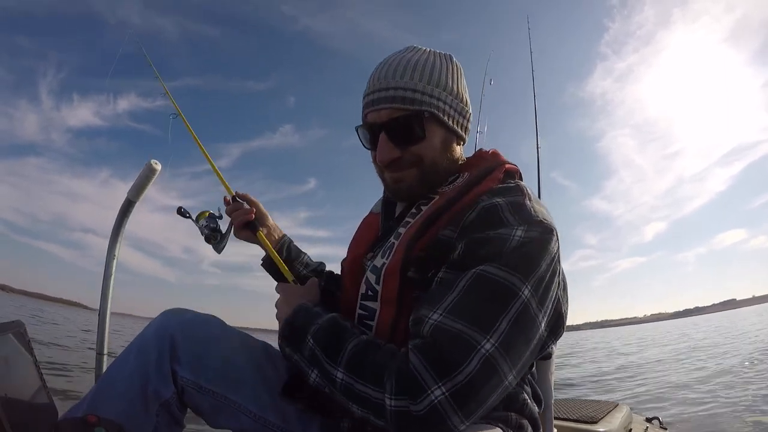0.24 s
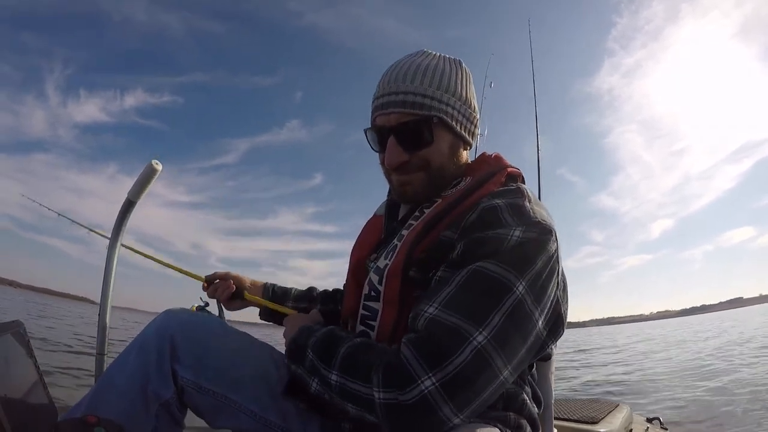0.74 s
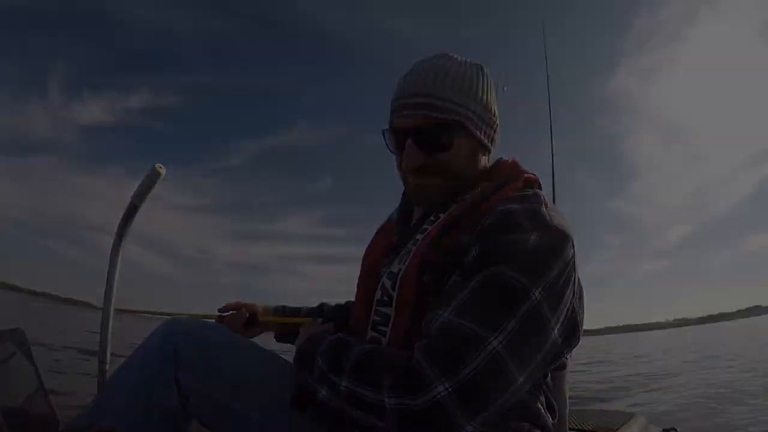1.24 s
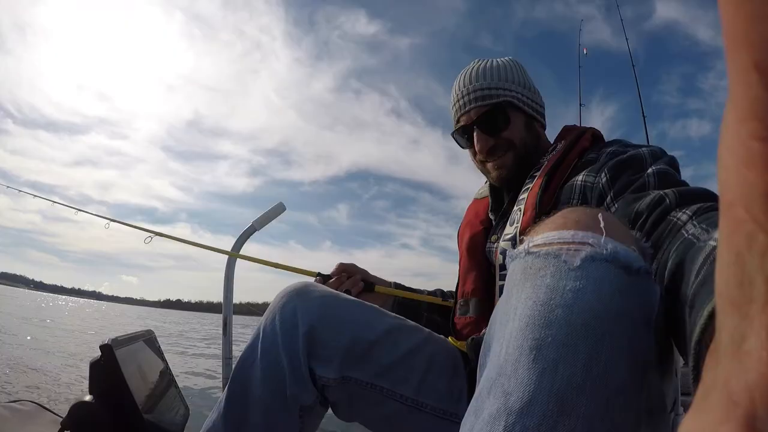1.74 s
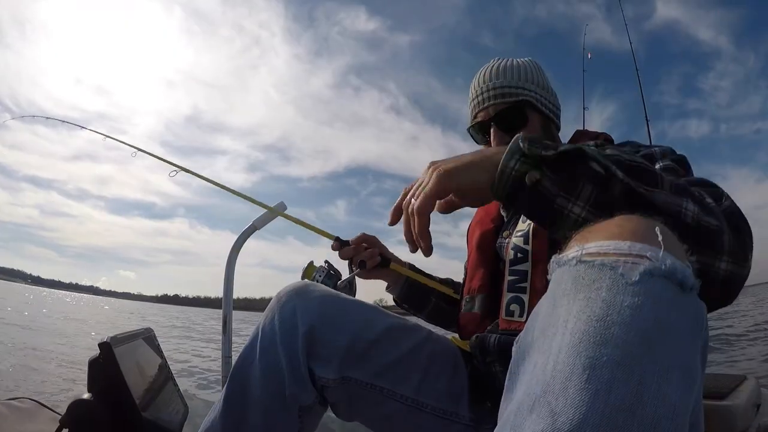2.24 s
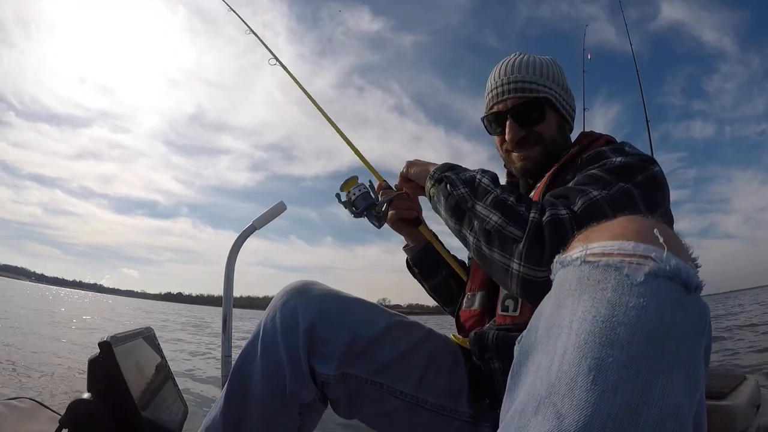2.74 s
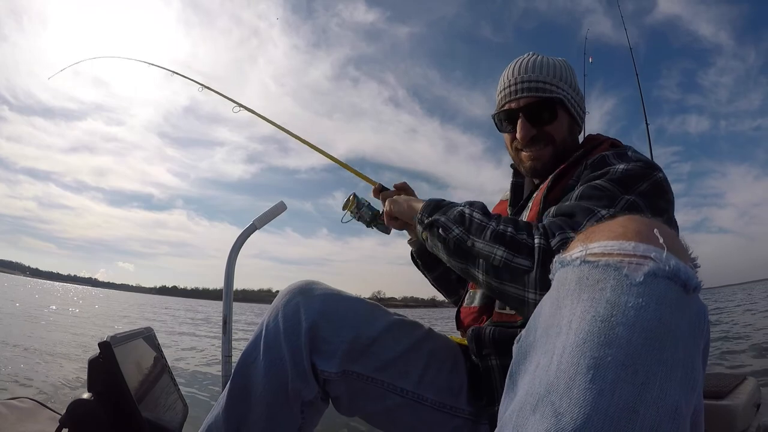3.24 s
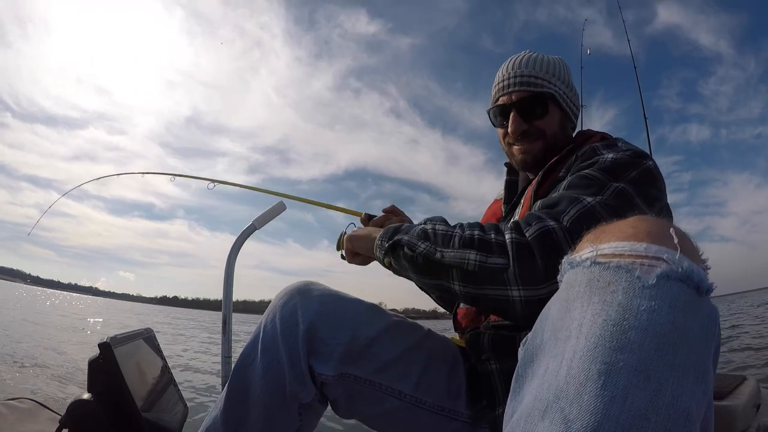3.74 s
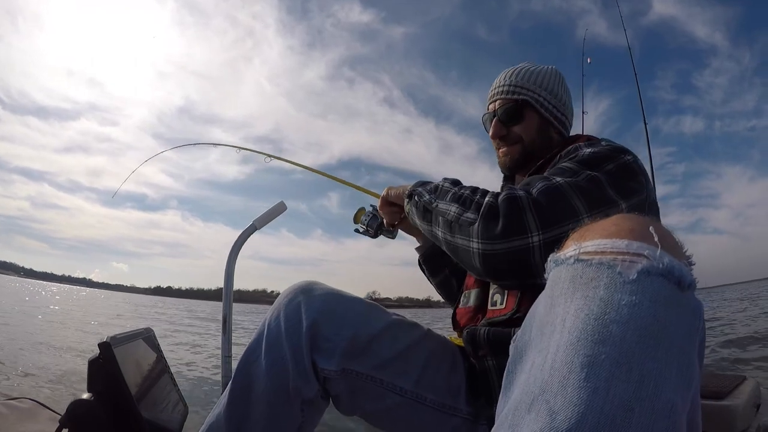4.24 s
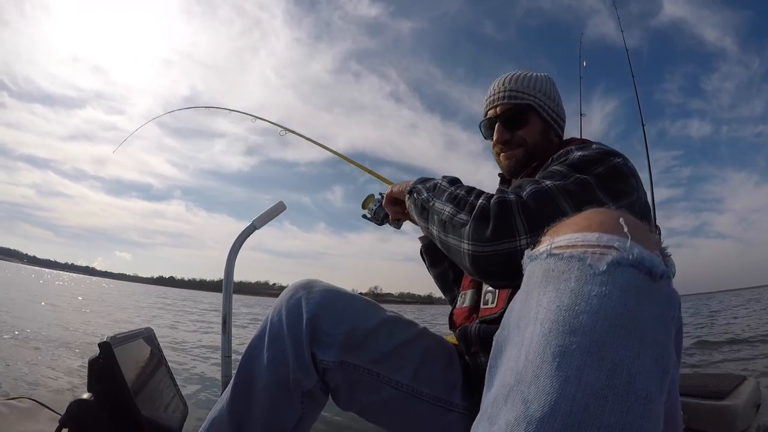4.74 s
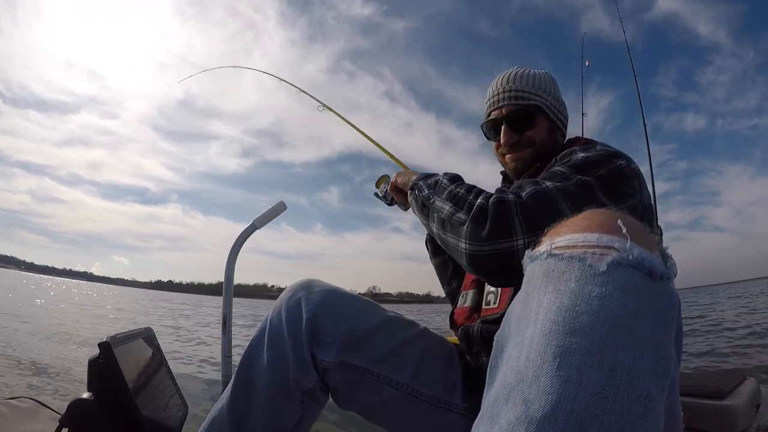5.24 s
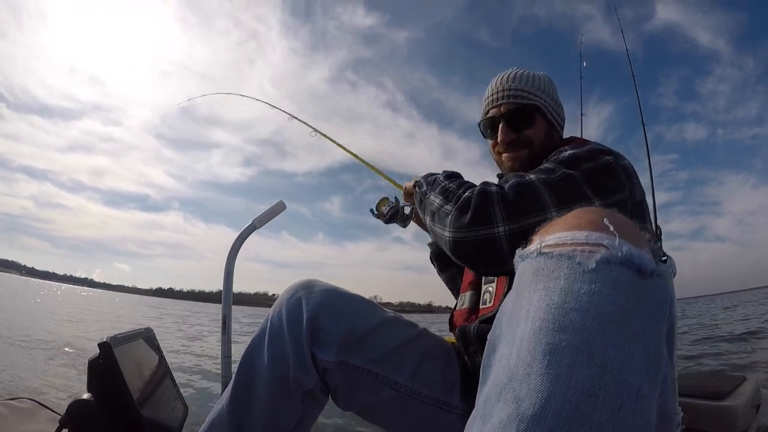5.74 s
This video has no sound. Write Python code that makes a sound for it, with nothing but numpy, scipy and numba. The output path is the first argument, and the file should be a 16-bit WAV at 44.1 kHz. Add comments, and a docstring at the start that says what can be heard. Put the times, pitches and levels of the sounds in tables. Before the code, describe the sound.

Four dull, quiet knocks with loose rattling fade away, leaving a very short gap. A hard cut brings a heavy jolt and strong, regular clanking blows on the hollow hull, each followed by a rebound and smaller metallic ticks. A steady whirring motor, gritty hiss and low wind rumble fill the spaces. Very close, hull-mounted microphone outdoors on water, with slightly distorted peaks.

```python
"""On a boat, microphone fixed to the hull: a motor-driven metal hammer beats a plastic kayak.
The arm bounces, is picked up again by a cam and rattles between blows. Heard softly and fading out from a
first mount, then at once from a livelier second mount, with gear whine, wallowing hull and wind rumble.
Metal is noise bursts and ringing modes, the hull a bank of panel modes, the motor overtones and gritty hiss;
wind is low noise, and blows overload the microphone."""
import sys
import numpy as np
from scipy import signal
from scipy.fft import rfft, irfft
from scipy.io import wavfile
from scipy.ndimage import uniform_filter1d
from numba import njit

SR = 44100
rng = np.random.default_rng(int(sys.argv[2]) if len(sys.argv) > 2 else 0)


def file_out(sig):
    """Save sig as 16-bit WAV at sys.argv[1]."""
    # one column per channel
    cols = np.atleast_2d(sig).T
    # limit, then scale
    lim = np.clip(cols, -1, 1)
    pcm = np.round(lim * 32767).astype(np.int16)
    wavfile.write(sys.argv[1], SR, pcm)


N = 263718

# All contact levels are relative; scene() sets the balance of the layers.
# hammer blows: start_s [s], clack_db [dB], boom_db [dB], knock_db [dB]
BLOWS = [(0.086, -17, -16, -15.5), (0.5109, -18, -12, -17), (0.928, -17.5, -27, -17),
         (1.3573, -23, -26, -26), (1.7697, -46.5, -58, -48), (1.9324, 5.5, 1, -2.5), (2.3486, 1, -1.5, -4),
         (2.7568, 2, -3.5, -5.5), (3.1783, 2, -6, -5), (3.5968, 4, -3.5, -5), (4.0105, 1, -6.5, -4),
         (4.4307, 1, -3.5, -5.5), (4.8401, 2, -3.5, -6), (5.2648, 1.5, -3, -5.5), (5.673, 2, -1.5, -6)]
# hull panels: pitch_hz [Hz], t60_s [s], then level_db [dB] of first-mount blows, first-mount rattles,
# second-mount blows, second-mount rattles
HULL_PANELS = [(121.4, 0.04, -21.5, -2, -10, -38), (158.5, 0.065, -17, -17, 5, -0.5),
               (228, 0.09, 11, 5.5, 1.5, 2.5), (254.1, 0.13, -5.5, -1.5, -6.5, -7),
               (295.4, .12, -18, -15.5, -18, -6.5), (338.5, 0.096, -10, -13.5, -9.5, -19),
               (393.8, 0.11, -14, -8, -13, -13), (441, .08, -22, -11.5, -4.5, -3.5),
               (479.7, 0.08, -9, -12.5, -9.5, -4), (532, 0.14, -23, -15, -21, -14.5),
               (648.3, 0.041, -14, -9.5, -8.5, -7), (819.4, 0.053, -23, -18.5, -5.5, -13),
               (865.5, 0.086, -12.5, -26.5, -18, -18.5), (1237, 0.038, -20, -31.5, -8, -54),
               (1250, 0.0083, -40, -44, -16.5, -54)]
# modes of the metal arm: pitch_hz [Hz], level_db [dB], t60_s [s]
ARM_MODES = [(1160, -8, 0.03), (1747, 0, 0.0071), (2196, -5.5, 0.01), (2620, -11, .02), (3318, 4, 0.011),
             (3730, -5.5, .02), (4547, -7.5, 0.024), (4670, -7.5, .015), (5320, -12.5, 0.015),
             (5434, -7, 0.023), (7170, -17, 0.025), (7500, -34, .014), (8460, -17.5, .01),
             (10800, -32, 0.013)]
# contact noise of the metal: freq_hz [Hz], level_db [dB per Hz]
CRACK_SPECTRUM = [(530, 5.5), (900, -11), (2080, -5.5), (3820, 1), (4360, -4.5), (6670, -21.5),
                  (8400, -21.5), (11400, -22), (14300, -40), (15400, -62), (16400, -75)]
# motor pitch over one turn of the cam: after_blow_s [s], first_hz [Hz], later_hz (a little faster) [Hz]
CAM_PITCH = [(0, 757, 762), (.05, 750, 763), (.08, 722, 730), (.17, 731, 749), (.21, 733, 741),
             (.3, 742, 752), (.42, 757, 763)]
# motor overtones: multiple [of the fundamental], first_mount_db [dB], second_mount_db [dB]
WHINE_OVERTONES = [(1, -2, 0), (2, -16, -17), (3, -24, -12), (4, -13, -25), (5, -16, -26), (6, -16, -21),
                   (7, -23, -22), (8, -19, -40), (9, -9, -21), (10, -24, -27), (11, -37, -28),
                   (12, -17, -26), (13, -14, -32), (14, -23, -29), (15, -32, -28), (16, -36, -29),
                   (17, -45, -33), (18, -47, -35), (19, -45, -40)]
# gear and water hiss: freq_hz [Hz], level_db [dB against white noise of rms 1]
GEAR_SPECTRUM = [(60, -39), (150, -12), (300, -36.5), (450, -34), (900, -41), (1600, -46), (3400, -47),
                 (4200, -51), (5000, -54), (6200, -56), (8500, -57), (11500, -58), (13000, -60),
                 (14600, -66), (16000, -77.5)]
# hiss level over time: start_s [s], level_db [dB]
HISS_LEVEL = [(0, -22), (1.0, -25), (1.5, -39), (1.8, -34), (1.861, -64), (1.863, 3.5), (6, -1.5)]
# overload level through the fade: start_s [s], level_db [dB]
OVERLOAD_LEVEL = [(0, -8.6), (1.0, -8.6), (1.4, -14), (1.8, -36), (1.861, -36), (1.862, -.6), (6, -.6)]
# response of the first mount to metal sounds: freq_hz [Hz], gain_db [dB]
FIRST_MOUNT_RESPONSE = [(150, -9), (700, -2), (1200, 4.5), (1800, -20), (2600, -8), (3400, -10.5),
                        (4600, 1.5), (7000, 0), (9500, 7), (12000, 6), (15000, 2.5)]
# noise of loose parts, also used for scraping: freq_hz [Hz], level_db [dB per Hz]
BUZZ_SPECTRUM = [(500, -12.5), (900, 4), (1600, 12), (3300, 10.5), (5000, 2), (7000, -15), (12000, -21),
                 (15000, -36)]
# whine level over one turn of the cam: after_blow_s [s], level_db [dB]
WHINE_LOAD = [(0, 5), (.03, -5), (.09, -1), (.14, -4.5), (.22, -2), (.32, -0.5), (.42, -4.5)]
# cam sliding under the arm: start_s [s], level_db [dB]
SCRAPE_LEVEL = [(1.86, -89), (2.02, -57), (2.86, -56), (3.0, -44), (3.29, -54), (3.5, -46), (4.55, -68),
                (5.38, -62), (5.47, -48), (5.98, -53)]
# whine level over time: start_s [s], level_db [dB]
WHINE_FADE = [(0, -7), (1.0, -4), (1.5, -14), (1.8, -30), (1.861, -60), (1.863, 1.5), (6, 2.5)]
# rebounds of the arm, second mount: start_s [s], clack_db [dB], knock_db [dB]
REBOUNDS = [(2.0091, -3.5, -17), (2.4173, -3, -17), (2.836, -3, -15.5), (3.249, -7, -16),
            (3.6713, -1.5, -21), (4.0805, -7, -22), (4.504, -4, -13.5), (4.9137, -5, -16),
            (5.3377, -3.5, -22), (5.7417, -4, -19)]
# pick-ups of the arm by the cam, second mount: start_s [s], clack_db [dB], knock_db [dB]
PICKUPS = [(2.1245, -15.5, -7.5), (2.5272, -12, -5.5), (2.9614, -15, -9.5), (3.37, -11, -6.5),
           (3.7911, -9.5, -10), (4.1988, -17, -11.5), (4.6164, -17, -13), (5.0323, -13.5, -13.5),
           (5.4493, -7, -10.5), (5.8577, -16, -13.5)]
# catches of the slack, second mount: start_s [s], clack_db [dB], knock_db [dB], treble_db [dB against clack]
CATCHES = [(2.2039, -5.5, -19, -7), (2.5961, -6, -14.5, -19), (3.0515, -6.5, -21.5, -30),
           (3.4431, -7, -15.5, -12.5), (3.8641, -11.5, -15.5, -10), (4.2699, -7, -13.5, -8),
           (4.6899, -7, -19, -5), (5.1056, -11.5, -11.5, -7.5), (5.5202, -10.5, -19, -6),
           (5.9329, -12.5, -12.5, -1.5)]
# loose knocks at the first mount, and a thump as the second mount begins: # start_s [s], clack_db [dB],
# knock_db [dB], treble_db [dB against clack]
KNOCKS = [(0.1408, -28, -27.5, -20), (0.1505, -47, -46, 5), (0.1892, -36, -20, -19),
          (0.2265, -40, -31.5, -9), (0.2481, -39, -35, -9), (0.5532, -38, -25, -13),
          (0.5806, -33, -18.5, 0), (0.6184, -55, -30.5, -6), (0.6479, -44, -48, -12),
          (0.6885, -31, -19, -8), (0.7257, -40, -31.5, -2), (0.9785, -37, -27, -13),
          (0.9917, -39, -41.5, -3), (1.0306, -40, -21.5, -22), (1.072, -40, -35, -4),
          (1.3997, -45, -28, -21), (1.4151, -42, -31, -4), (1.4525, -70, -37.5, -11),
          (1.5219, -40.5, -34, -13), (1.861, -52, -16, -8)]
# wind rumble: freq_hz [Hz], level_db [dB per Hz]
WIND_SPECTRUM = [(2, -20), (7, 0), (16, 0), (30, -9), (45, -24), (120, -60), (1000, -110)]
# many small hull modes together: freq_hz [Hz], level_db [dB per Hz]
WASH_SPECTRUM = [(90, -30), (150, -3), (230, 0), (450, -5), (900, -20), (1600, -40), (4000, -80)]

# Pairs below are (first mount, second mount) unless noted.
CUT_S, SILENT_S = 1.86, 1.803  # change of mount; end of the fade, silent until the change
BOOM_TOP_HZ, BRIGHT_HZ, TOP_HZ = 190, 6000, 15900
WHINE_DB = (-64, -41)  # reference rms of the overtones, before load and fade
THIN_TONE_HZ, THIN_TONE_DB = 14400, (-96, -79)  # thin tone, before load and fade
RATTLE_BODY_DB = 0.5
TRAVEL_CYCLES = (1.2, .1)  # delay of each panel in its own cycles

# colour of a contact: (treble dB against clack, buzz dB against clack), before the balance in scene()
REBOUND, PICKUP, TICK = (-7, -25), (-5, -8), (-25, -11)
CATCH_BUZZ_DB, KNOCK_BUZZ_DB = -22, -9  # against the clack
# touch beside a contact: (offset s, clack dB and knock dB against it, treble dB and buzz dB of its own)
BLOW_TOUCH_FIRST, BLOW_TOUCH = (.0213, -33, -6, -16, -17), (.02, -9, -9, -10, -24)
REBOUND_TOUCH, REBOUND_SETTLE = (.023, -15, 1, -28, -12), (.04, -32, -3, -10, -12)
PICKUP_TOUCH, CATCH_TOUCH = (.02, -2, -3, -14, -9), (-.0102, -14, -12, -10, -17)
RELEASE_TICK_FIRST = (-.091, -33, -45, -24, -13)
TICKS_AFTER_CATCH_S = (.028, .11)  # earliest, latest of three stray ticks a turn
TICK_DB, TICK_KNOCK_DB, TICK_SCATTER_DB = -33, -34, 4

WALLOW_HZ, WALLOW_RISE_S, WALLOW_T60_S = 64.5, .033, .36
WALLOW_BLOW_DB, WALLOW_KNOCK_DB = (-13, -15), (-11, -17)  # against the knock
WALLOW_REST_DB, JOLT_WALLOW_DB = (-66, -37), -13
WIND_DB, WIND_GUST_DB, SHUDDER_DB = (-55, -26.5), 2.5, -14  # shudder is against the wallow
JOLT_S, JOLT_WIDTH_S, JOLT_DB = 1.877, .005, -7  # the second mount is shoved once
WASH_RISE_S, WASH_T60_S = .015, .29
WASH_BLOW_DB, WASH_KNOCK_DB = -25, -23  # against the knock


def undb(db):
    """dB to gain."""
    return 10 ** (np.asarray(db) / 20)


def curve(s, values):
    """Points joined by straight lines, one value a sample."""
    return np.interp(np.arange(N) / SR, s, values)


def shape(x, points):
    """Filter a sound by (Hz, dB) points, straight over log frequency."""
    hz, db = np.transpose(points)
    f = np.maximum(np.fft.rfftfreq(N, 1 / SR), 1)
    gain = undb(np.interp(np.log(f), np.log(hz), db))
    return irfft(rfft(x) * gain, N)


def coloured(points):
    """Noise of rms 1 with the given spectrum."""
    x = shape(rng.standard_normal(N), points)
    return x / x.std()


def grains(grain_db, size):
    """Uneven grains of the given length in samples, rms 1."""
    steps = np.repeat(rng.standard_normal(N // size + 1), size)[:N]
    g = uniform_filter1d(undb(grain_db * steps), size=size // 2)
    return g / np.sqrt(np.mean(g ** 2))


def walk(size):
    """Slow random wander, spread 1."""
    x = uniform_filter1d(uniform_filter1d(rng.standard_normal(N), size), size)
    return x / x.std()


def train(s, size):
    """An impulse of the given size at each time."""
    x = np.zeros(N)
    np.add.at(x, np.clip((s * SR).astype(int), 0, N - 1), size)
    return x


def ring(x, hz, t60):
    """One mode: a unit impulse gives a sine decaying from height 1."""
    r = np.exp(-np.log(1000) / (t60 * SR))
    w = 2 * np.pi * hz / SR
    return signal.lfilter([0, r * np.sin(w)], [1, -2 * r * np.cos(w), r * r], x)


def burst(x, rise_s, t60):
    """Envelope that rises and decays after each impulse."""
    t = np.arange(int(.15 * SR)) / SR
    pulse = (1 - np.exp(-t / rise_s)) * 1000 ** (-t / t60)
    return np.abs(signal.fftconvolve(x, pulse / pulse.max())[:N])


def motor_hiss():
    """Gears and water make a gritty hiss: coloured noise in uneven grains."""
    return undb(curve(*np.transpose(HISS_LEVEL))) * grains(2.1, size=300) * shape(rng.standard_normal(N), GEAR_SPECTRUM)


def whine():
    """The motor sags as the cam takes the load and climbs back until the arm drops; a thin tone rides along."""
    t, blows = np.arange(N) / SR, np.array(BLOWS)[:, 0]
    turn_s = CAM_PITCH[-1][0]
    first, again = t < CUT_S, blows[blows > CUT_S][0]
    # time since the last blow; before the first blow at each mount, count back from the end of a turn
    since = t - np.r_[blows[0] - turn_s, blows][np.searchsorted(blows, t)]
    since = np.where(~first & (t < again), t - again + turn_s, since)
    after, first_hz, later_hz = np.transpose(CAM_PITCH)
    hz = np.where(first, np.interp(since, after, first_hz), np.interp(since, after, later_hz))
    hz = hz + 15. * uniform_filter1d(rng.standard_normal(N), size=600)
    phase, out = 2 * np.pi * np.cumsum(hz) / SR, 0
    for k, first_db, later_db in WHINE_OVERTONES:
        # each overtone flickers on its own
        flicker_db = 100. * uniform_filter1d(uniform_filter1d(rng.standard_normal(N), size=1500), size=500)
        db = np.where(first, first_db + WHINE_DB[0], later_db + WHINE_DB[1]) + flicker_db
        out = out + np.sqrt(2) * undb(db) * np.sin(k * phase + 2 * np.pi * rng.random())
    thin_tone = np.sin(2 * np.pi * THIN_TONE_HZ * t)
    out = out + np.sqrt(2) * undb(np.where(first, *THIN_TONE_DB)) * thin_tone
    load_db = np.interp(since, *np.transpose(WHINE_LOAD))
    return out * undb(load_db + curve(*np.transpose(WHINE_FADE)))


def wallow_and_wind(blow_s, blow_db, knock_s, knock_db):
    """Every contact sets the whole hull wallowing near one pitch; wind rumbles below it."""
    first = np.arange(N) / SR < CUT_S
    # doubled dB: kicks add as powers
    kicks = (train(blow_s, undb(2 * (blow_db + np.where(blow_s < CUT_S, *WALLOW_BLOW_DB))))
             + train(knock_s, undb(2 * (knock_db + np.where(knock_s < CUT_S, *WALLOW_KNOCK_DB))))
             + train(np.array([CUT_S]), undb(2 * JOLT_WALLOW_DB)))
    t = np.arange(SR) / SR
    swell = ((1 - np.exp(-(t / WALLOW_RISE_S) ** 2)) * 1000 ** (-t / WALLOW_T60_S)) ** 2
    swing = np.sqrt(np.abs(signal.fftconvolve(kicks, swell / swell.max())[:N]))
    hz = WALLOW_HZ + 110. * uniform_filter1d(rng.standard_normal(N), size=3000)
    wallow = np.sqrt(2) * np.sin(2 * np.pi * np.cumsum(hz) / SR)
    wind = signal.hilbert(coloured(WIND_SPECTRUM))
    wind = np.real(wind) / (.4 + np.abs(wind)) * 1.9  # evened out to rms near 1
    rest = undb(np.where(first, *WALLOW_REST_DB) + 3.5 * walk(size=2500))
    gusts = undb(np.where(first, *WIND_DB) + WIND_GUST_DB * walk(size=2500))
    jolt = -undb(JOLT_DB) * np.exp(-((np.arange(N) / SR - JOLT_S) / JOLT_WIDTH_S) ** 2 / 2)
    return jolt + np.hypot(swing, rest) * wallow + np.hypot(undb(SHUDDER_DB) * swing, gusts) * wind


def clacks(s, db, treble_db, rise_s, t60, ring_db):
    """Metal chatters on contact for some ms and rings the arm; sharp contacts carry more treble."""
    noise, out = rng.standard_normal(N), 0
    crack = coloured(CRACK_SPECTRUM)
    for band_db, kind in ((db, "low"), (db + treble_db, "high")):
        envelope = burst(train(s, undb(band_db)), rise_s, t60)
        arm = 0
        for hz, mode_db, mode_t60 in ARM_MODES:
            if (hz > BRIGHT_HZ) == (kind == "high"):
                arm = arm + undb(mode_db) * ring(envelope * noise, hz, mode_t60) / np.sqrt(mode_t60 * SR)
        band = signal.butter(4, BRIGHT_HZ, kind, fs=SR, output="sos")
        out = out + envelope * signal.sosfilt(band, crack) + undb(ring_db) * arm
    return out


def buzz(s, db, t60):
    """Loose parts jitter while the hull shakes: grainy noise decaying after each contact."""
    return burst(train(s, undb(db)), .004, t60) * grains(4., size=100) * coloured(BUZZ_SPECTRUM)


def hull(s, boom_db, knock_db, scatter_db, spread_s, order):
    """Bending waves reach the mount later the lower they are; loose contacts strike each panel differently."""
    out, chance = 0, rng.standard_normal((len(s), len(HULL_PANELS), 2))
    for k, (hz, t60, *gains_db) in enumerate(HULL_PANELS):
        panel_db = np.where(s < CUT_S, gains_db[order], gains_db[2 + order])  # order: 0 blows, 1 rattles
        db = panel_db + (boom_db if hz < BOOM_TOP_HZ else knock_db)
        late = s + np.where(s < CUT_S, *TRAVEL_CYCLES) / hz + spread_s * np.abs(chance[:, k, 1])
        # each panel is driven for part of a cycle, so it swells before it decays
        t = np.arange(int(.7 * SR / hz))
        drive = np.hanning(len(t)) * np.cos(2 * np.pi * hz * (t - len(t) / 2) / SR)
        hits = train(late, undb(db + scatter_db * chance[:, k, 0]))
        push = signal.fftconvolve(hits, drive / drive.sum())[:N]
        out = out - ring(push, hz, t60)
    return signal.sosfilt(signal.butter(4, 108., "high", fs=SR, output="sos"), out)


def wash(s, db):
    """The hollow hull murmurs on after each contact, its many small modes heard as grainy noise."""
    t = np.arange(SR // 2) / SR
    tail = (1 - np.exp(-t / WASH_RISE_S)) ** 2 * 1000 ** (-2 * t / WASH_T60_S)
    power = np.abs(signal.fftconvolve(train(s, undb(2 * db)), tail / tail.max())[:N])
    return np.sqrt(power) * grains(2.5, size=500) * coloured(WASH_SPECTRUM)


def with_colour(rows, *colour):
    """Append the same colour columns to every contact."""
    return np.c_[rows, np.tile(colour, (len(rows), 1))]


def touch(rows, rule):
    """A second touch beside each contact, offset in time and level."""
    return with_colour(np.array(rows)[:, :3] + rule[:3], *rule[3:])


def contacts():
    """All lesser contacts of the arm as rows (start_s, clack_db, knock_db, treble_db, buzz_db)."""
    blows = np.array(BLOWS)[:, [0, 1, 3]]
    first = blows[:, 0] < CUT_S
    caught = np.repeat(np.array(CATCHES)[:, 0], 3)
    chance = rng.random((len(caught), 2))
    early, late = TICKS_AFTER_CATCH_S
    tick_s = caught + early + (late - early) * chance[:, 0]
    scatter_db = TICK_SCATTER_DB * (2 * chance[:, 1] - 1)
    ticks = np.c_[tick_s, TICK_DB + scatter_db, TICK_KNOCK_DB + scatter_db]
    rows = np.vstack([
        touch(blows[first], RELEASE_TICK_FIRST), touch(blows[first], BLOW_TOUCH_FIRST),
        with_colour(KNOCKS, KNOCK_BUZZ_DB), touch(blows[~first], BLOW_TOUCH),
        with_colour(REBOUNDS, *REBOUND), touch(REBOUNDS, REBOUND_TOUCH), touch(REBOUNDS, REBOUND_SETTLE),
        with_colour(PICKUPS, *PICKUP), touch(PICKUPS, PICKUP_TOUCH),
        with_colour(CATCHES, CATCH_BUZZ_DB), touch(CATCHES, CATCH_TOUCH), with_colour(ticks, *TICK)])
    return rows[(rows[:, 0] > 0) & (rows[:, 0] < N / SR)]


def scrape():
    """The cam slides under the arm: gritty noise between the knocks, at the second mount only."""
    s, db = np.transpose(SCRAPE_LEVEL)
    level = (np.arange(N) / SR > s[0]) * undb(curve(s, db))
    return level * grains(3.5, size=200) * coloured(BUZZ_SPECTRUM)


def scene():
    """Blows, rattles, motor and low end as they reach the microphone on the boat."""
    t = np.arange(N) / SR
    blow_s, clack_db, boom_db, blow_db = np.transpose(BLOWS)
    metal = clacks(blow_s, clack_db - 3, -2.5, 0.0002, 0.026, 7.0)
    metal = metal + buzz(blow_s, blow_db - 12, 0.055)
    body = undb(10.5) * hull(blow_s, boom_db, blow_db, 1.0, .0001, order=0)
    # lesser contacts: softer onset, more treble, more scatter
    s, clack_db, knock_db, treble_db, buzz_db = contacts().T
    metal = metal + clacks(s, clack_db - 12, treble_db + 20.5, 0.0018, 0.019, 2.4)
    metal = metal + buzz(s, clack_db + buzz_db, 0.048)
    body = body + undb(RATTLE_BODY_DB) * hull(s, knock_db, knock_db, 2.5, .004, order=1)
    body = body + wash(np.r_[blow_s, s], np.r_[blow_db + WASH_BLOW_DB, knock_db + WASH_KNOCK_DB])
    metal = metal + motor_hiss() + scrape()
    metal = np.where(t < CUT_S, shape(metal, FIRST_MOUNT_RESPONSE), metal)
    lows = wallow_and_wind(blow_s, blow_db, s, knock_db)
    audible = (t < SILENT_S) | (t > CUT_S)
    return (audible * (metal + body + whine() + lows))[None]


@njit
def follow(x, attack, release):
    """Level detector, quick up and slow down."""
    e, y = 1e-6, np.empty(len(x))
    for i in range(len(x)):
        e += (abs(x[i]) - e) * (attack if abs(x[i]) > e else release)
        y[i] = e
    return y


def record(dry):
    """At the microphone, gain control ducks after loud blows, the peaks overload, the top is cut."""
    top = undb(curve(*np.transpose(OVERLOAD_LEVEL)))
    x = dry[0] / top
    level = follow(x, 1 / (0.015 * SR), 1 / (.08 * SR))  # 15 ms up, 80 ms down
    x = x * np.minimum(1, undb(-27) / level) ** 0.19
    x = x / (1 + np.abs(x) ** 4) ** (1 / 4)  # soft overload
    return signal.sosfilt(signal.ellip(12, .2, 100, TOP_HZ, fs=SR, output="sos"), top * x)[None]


dry = scene()
out = record(dry)
file_out(out)
```